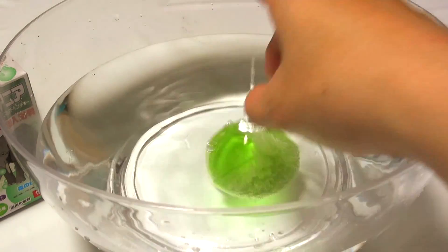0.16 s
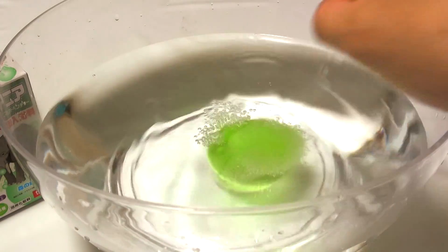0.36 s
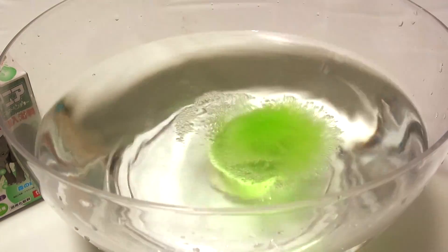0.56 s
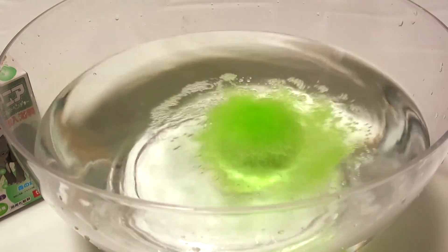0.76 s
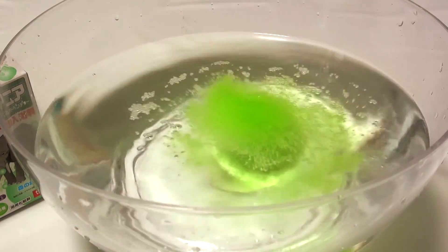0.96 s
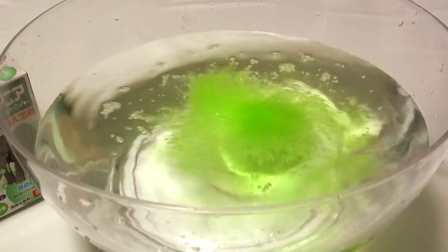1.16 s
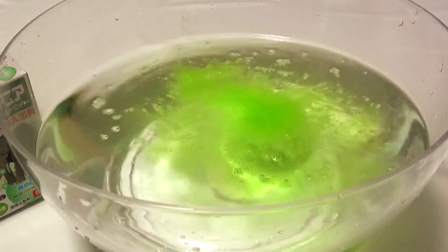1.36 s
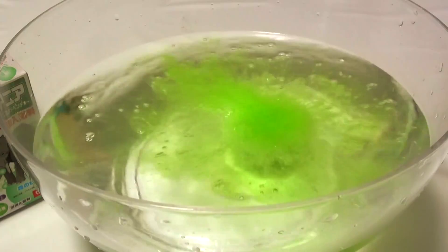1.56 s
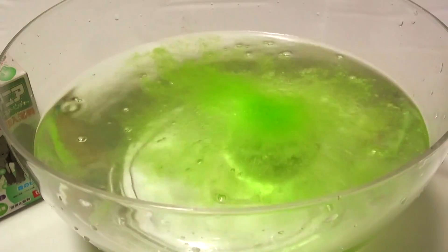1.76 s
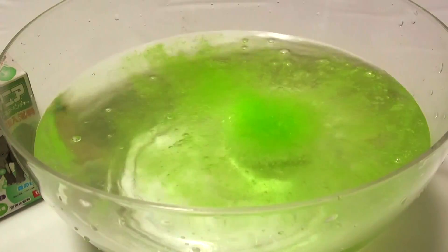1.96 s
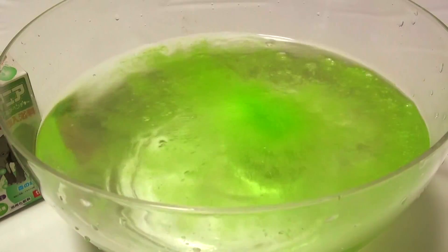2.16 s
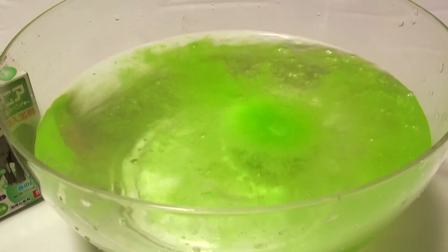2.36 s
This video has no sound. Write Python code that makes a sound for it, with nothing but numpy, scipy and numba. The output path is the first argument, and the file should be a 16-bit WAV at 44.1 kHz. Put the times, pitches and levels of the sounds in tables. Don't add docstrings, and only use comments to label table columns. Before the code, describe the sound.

A fizzing ball dropped into a plastic bowl of water: brief hiss on touching, a loud hollow knock with tiny bounces, then bright fizz building steadily with popping bubbles, over low fan rumble in a room, miked close.

```python
import sys
import numpy as np
from scipy import signal
from scipy.fft import rfft, irfft
from scipy.io import wavfile
from scipy.ndimage import uniform_filter1d
from numba import njit

SR = 44100
rng = np.random.default_rng(int(sys.argv[2]) if len(sys.argv) > 2 else 0)


def output_pcm(signal):
    pcm = np.clip(np.atleast_2d(signal).T, -1, 1) * 32767
    wavfile.write(sys.argv[1], SR, np.round(pcm).astype(np.int16))


def voltage_ratio(decibels):
    exponent = np.asarray(decibels, float) / 20
    return 10 ** exponent


N = 105840

# (frequency [Hz], density [dB/Hz])
ROOM_AIR = [(20, -16), (60, -2), (250, -2), (1100, -6.5), (1450, -14), (2400, -15), (3200, -23),
            (9000, -38)]
# (frequency [Hz], width [Hz], level [dB])
ROOM_HUMS = [(102.3, 24, -54), (177.9, 24, -48), (218, 21, -56)]
# (time [s], level [dB])
TREMBLE_LEVEL = [
    (0, -61),
    (.3, -53.5),
    (.8, -59),
    (1.08, -54.5),
    (1.2, -68),
    (1.4, -48),
    (1.62, -53.5),
    (1.8, -59),
    (2.05, -50.5),
    (2.4, -63),
]
# (time [s], blow [dB], push length [s], tick [dB], tick softness [ratio])
CONTACTS = [
    (0.2364, -14.5, 0.00077, -16, 1.07),
    (.2605, -31.5, 0.00076, -55, 3.7),
    (0.2749, -20, 0.0033, -60, 2.5),
    (0.318, -38, 0.00035, -39, 2.3),
    (0.3256, -51, .0007, -26, 3.3),
]
# (frequency [Hz], level [dB], t60 [s])
BOWL_MODES = [(169, -11, 0.27), (225.9, 6, 0.1), (290, -2, 0.19), (340, -16.5, 0.32), (440.4, -8, 0.095),
              (507, -5, 0.16), (648, 3, 0.047), (681, 1, 0.091), (751, -15.5, 0.1), (1133, -7, 0.054),
              (1267, -12.5, 0.089), (2495, 5, 0.038)]
# (frequency [Hz], width [Hz], level [dB])
TICK_BANDS = [(1790, 250, -5.5), (2490, 760, -2), (3620, 680, -2), (4930, 430, -4.5), (6070, 1060, -7.5),
              (9300, 750, -10.5), (12400, 710, -1.5), (14500, 2300, -14)]
# (frequency [Hz], density [dB/Hz])
WASH_COLOUR = [(90, -6.5), (220, 5), (700, 4.5), (1300, -19), (1900, -12.5), (2550, -13.5), (4000, -19),
               (7000, -36)]
# (time [s], level [dB])
FIZZ_LEVEL = [(0, -66), (.05, -52.5), (.09, -46.5), (.115, -49), (.135, -62), (.22, -66), (.3, -65.5),
              (.45, -58.5), (.53, -54.5), (.6, -50), (.7, -47.5), (1.05, -44.5), (1.3, -43), (1.7, -41.5),
              (1.8, -40), (1.95, -37.5), (2.15, -37.5), (2.4, -37.5)]
# (frequency [Hz], density [dB/Hz])
SWARM_COLOUR = [(700, -40), (2200, -17), (4200, -9.5), (7000, -6.5), (9400, -11), (13600, 0), (15500, 0),
                (16000, -8)]
# (time [s], peak [dB], pitch [Hz])
LARGE_POPS = [(0.6094, -53, 4720), (0.6734, -41, 6880), (0.8175, -41, 4870), (0.8426, -44, 3880),
              (0.8774, -43, 3370), (1.2007, -33, 7380), (1.2615, -42, 6950), (1.3538, -32, 5300),
              (1.3994, -47, 4050), (1.4466, -33, 5570), (1.5234, -39.5, 3640), (1.5564, -36, 5070),
              (1.6234, -37, 7340), (1.7694, -37, 7110), (2.113, -38, 4560), (2.1212, -26.5, 6370),
              (2.2015, -26, 7100), (2.3174, -35, 6240)]
# (frequency [Hz], difference [dB])
LEFT_MINUS_RIGHT = [(60, 2), (200, 3.5), (380, -0.2), (700, 1.5), (1290, 2.5), (2380, -0.7), (4400, -4),
                    (8120, 1), (12000, 0.5)]
# (frequency [Hz], level [dB])
UNSHARED = [(60, -24.5), (500, -15.5), (1200, -43), (2400, -67), (5500, -13.5), (9000, -2), (11500, -13),
            (16000, -48)]

ROOM_DB = -42.5
WALL_HZ, WALL_WIDTH_HZ = 664, 134
SWELL_S = 0.0055
TICK_LEAD_S, TICK_DECAY_S, TICK_TOP_HZ = 0.0018, 0.0012, 14000
THUMP_S, THUMP_HZ, THUMP_SAG_HZ_PER_S, THUMP_DB = 0.2372, 318, 1100, 0
THUMP_RISE_S, THUMP_FADE_S, THUMP_END_S, THUMP_CHOKE_S = 0.0032, 0.022, 0.0195, 0.0025
WASH_DB, WASH_T60_S = -24, 0.25
BURSTS_PER_S, BURST_CYCLES, BURST_SCATTER_DB, BURST_GLIDE = 9000, 3, 3.0, 0.058
MIST_DB = 1.5
POP_CYCLES, POP_GLIDE = 46, 0.06
STRAYS_PER_S, STRAY_DB = 74, -10
DUCK_DB, DUCK_S, RECOVER_S = -4.5, 0.234, 1.87
TOP_HZ = 15900


def level(x, db):
    return x * voltage_ratio(db) / np.sqrt(np.mean(x ** 2))


def along(table, hz):
    table = np.array(table, float)
    return np.interp(np.log(np.maximum(hz, 1)), np.log(table[:, 0]), table[:, 1])


def colour(x, table, share=1):
    gain_db = share * along(table, np.fft.rfftfreq(N, 1 / SR))
    return irfft(rfft(x) * voltage_ratio(gain_db), N)


def band(x, hz, width_hz):
    return signal.lfilter(*signal.iirpeak(hz, hz / width_hz, fs=SR), x)


def walk(rate_hz):
    k = int(SR / rate_hz)
    steps = np.repeat(rng.standard_normal(N // k + 1), k)
    return 1.98 * uniform_filter1d(uniform_filter1d(steps, k), k)[:N]


def decay(t, t60_s):
    return np.exp(-np.log(1000) * t / t60_s)


def room():
    swell_db = 0.5 * walk(1)
    air = np.zeros(N)
    for hz in 30 * 2 ** np.arange(0, 9.1, 0.5):
        air += band(rng.standard_normal(N), hz, hz / 2) * voltage_ratio(swell_db + 0.4 * walk(8.4))
    hums = np.zeros(N)
    for hz, width_hz, db in ROOM_HUMS:
        hum = band(band(rng.standard_normal(N), hz, width_hz), hz, width_hz)
        hums += level(hum, db) * voltage_ratio(walk(6.27))
    return level(colour(air, ROOM_AIR), ROOM_DB) + hums


def gain_control(t):
    since = t - DUCK_S
    duck_db = DUCK_DB * (since > 0) * np.exp(-np.maximum(since, 0) / RECOVER_S)
    return voltage_ratio(uniform_filter1d(duck_db, size=400))


def tremble(t):
    wall = band(band(rng.standard_normal(N), WALL_HZ, WALL_WIDTH_HZ), WALL_HZ, WALL_WIDTH_HZ)
    db = np.interp(t, *np.array(TREMBLE_LEVEL).T) + 1.6 * walk(38)
    return level(wall, 0) * voltage_ratio(db)


def bowl_ring(t):
    ring = np.zeros(N)
    for hz, db, t60_s in BOWL_MODES:
        swell = 1 - np.exp(-t * (hz / 300) ** 2 / SWELL_S)
        ring += voltage_ratio(db) * np.sin(2 * np.pi * hz * t) * decay(t, t60_s) * swell
    return ring[:SR // 2]


def contact_push(t):
    push = np.zeros(N)
    for at, blow_db, length_s, _, _ in CONTACTS:
        shape = np.exp(-0.5 * ((t - at) / (length_s / 8)) ** 2)
        push -= voltage_ratio(blow_db) * shape / shape.sum()
    return push


def contact_tick(t):
    grit = np.zeros(N)
    for at, _, _, tick_db, soft in CONTACTS:
        age = np.maximum(t - at + TICK_LEAD_S * soft, 0) / (TICK_DECAY_S * soft)
        burst = voltage_ratio(tick_db) * age * np.exp(1 - age) * rng.standard_normal(N)
        dull = np.exp(-2 * np.pi * TICK_TOP_HZ / soft ** 2 / SR)
        grit += signal.lfilter([1 - dull], [1, -dull], burst)
    return sum(voltage_ratio(db) * band(grit, hz, width_hz) for hz, width_hz, db in TICK_BANDS)


def thump(t):
    age = np.clip(t - THUMP_S, 0, 0.05)
    rise = 1 - np.exp(-(age / THUMP_RISE_S) ** 2)
    choke = 0.5 * (1 - np.tanh((age - THUMP_END_S) / THUMP_CHOKE_S))
    swing = rise * np.exp(-age / THUMP_FADE_S) * choke
    cycles = THUMP_HZ * age - 0.5 * THUMP_SAG_HZ_PER_S * age ** 2
    return band(voltage_ratio(THUMP_DB) * swing * np.sin(2 * np.pi * cycles), 378, 500)


def wash(t):
    since = np.maximum(t - THUMP_S, 0)
    noise = level(colour(rng.standard_normal(N), WASH_COLOUR), WASH_DB)
    return noise * (since > 0) * decay(since, WASH_T60_S)


def knocks(t):
    ringing = signal.fftconvolve(contact_push(t), bowl_ring(t))[:N]
    return ringing + contact_tick(t) + thump(t) + wash(t)


@njit
def bubbles(n, start, hz, cycles, size, glide, sr):
    out = np.zeros(n)
    for k in range(len(start)):
        length = cycles[k] * sr / hz[k]
        p = np.exp(2j * np.pi * hz[k] / sr - 6.9 / length)
        turn = np.exp(2j * np.pi * hz[k] / sr * glide / length)
        z = size[k] + 0j
        for i in range(start[k], min(n, start[k] + int(length))):
            out[i] += z.imag
            z *= p
            p *= turn
    return out


def swarm():
    when, pitch, rarity, spread = rng.random((int(BURSTS_PER_S * N / SR), 4)).T
    start = (when * N).astype(np.int64)
    hz = 2000 + 14500 * pitch
    cycles = BURST_CYCLES * hz / 6000 * (0.5 + spread)
    size = voltage_ratio(-BURST_SCATTER_DB * np.log(1 - 0.99 * rarity))
    bursts = bubbles(N, start, hz, cycles, size, BURST_GLIDE, float(SR))
    mist = level(rng.standard_normal(N), MIST_DB)
    return level(colour(level(bursts, 0) + mist, SWARM_COLOUR), 1.94)


def strays():
    when, pitch, weight = rng.random((int(STRAYS_PER_S * N / SR), 3)).T
    start = (when * N).astype(np.int64)
    hz = 5000 * 3.34 ** pitch
    size = voltage_ratio(STRAY_DB + 15 * weight)
    return bubbles(N, start, hz, POP_CYCLES * (0.5 + weight), size, POP_GLIDE, float(SR))


def pops():
    at, peak_db, hz = np.array(LARGE_POPS).T
    start = (at * SR).astype(np.int64)
    return bubbles(N, start, hz, POP_CYCLES + 0 * at, voltage_ratio(peak_db + 3.5), POP_GLIDE, float(SR))


def fizz(t):
    surge_db = np.interp(t, *np.array(FIZZ_LEVEL).T) + 0.2 * walk(9.7) + 0.32 * walk(40.55)
    return (swarm() + strays()) * voltage_ratio(surge_db) + pops()


def scene():
    t = np.arange(N) / SR
    duck = gain_control(t)
    hit = knocks(t)
    mid = fizz(t) + tremble(t) + room() * duck + hit
    apart = fizz(t) + room() * duck + 0.58 * np.roll(hit, shift=12)
    side = colour(apart, UNSHARED)
    left = colour(mid + side, LEFT_MINUS_RIGHT, 0.5)
    right = colour(mid - side, LEFT_MINUS_RIGHT, -0.5)
    return np.array([left, right])


def band_limit(x):
    return signal.sosfilt(signal.butter(12, 16870, fs=SR, output="sos"), x)


def record(dry):
    top_cut = signal.ellip(14, 0.3, 80, TOP_HZ, fs=SR, output="sos")
    mix = signal.sosfilt(top_cut, np.clip(dry, -0.96, 0.96))
    return band_limit(mix)


dry = scene()
out = record(dry)
output_pcm(out)
```